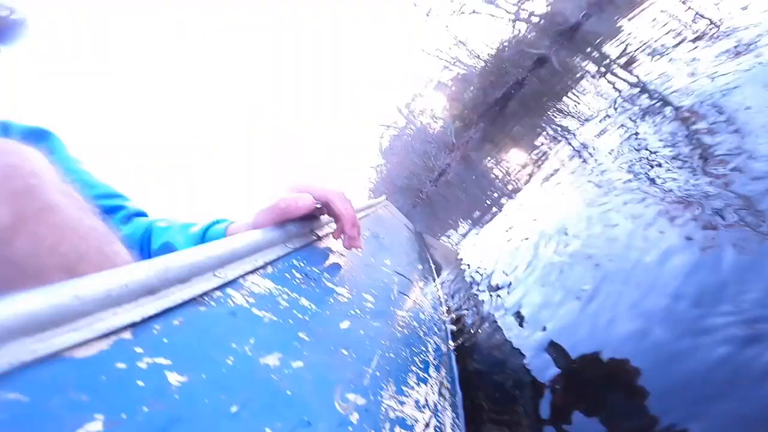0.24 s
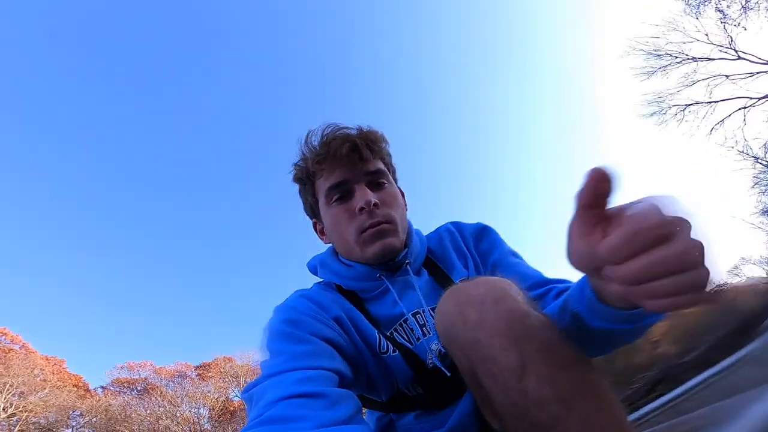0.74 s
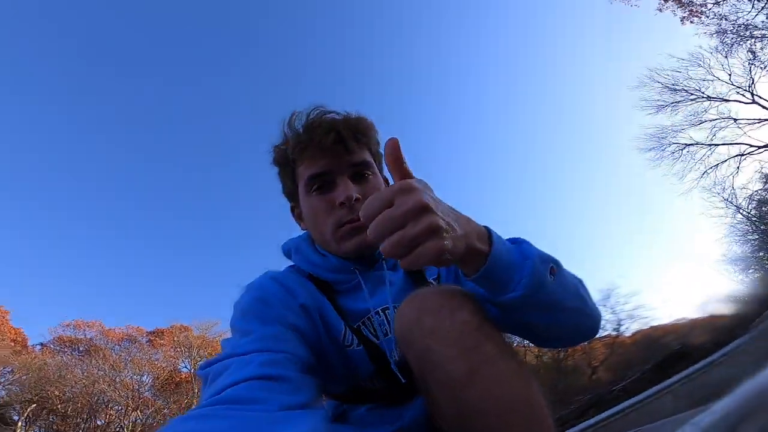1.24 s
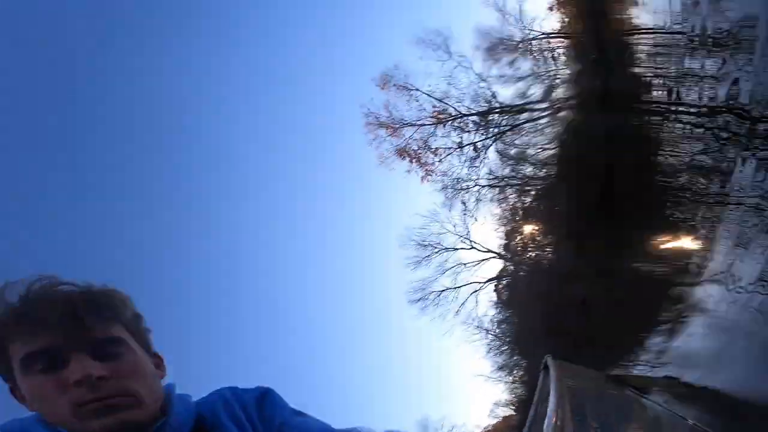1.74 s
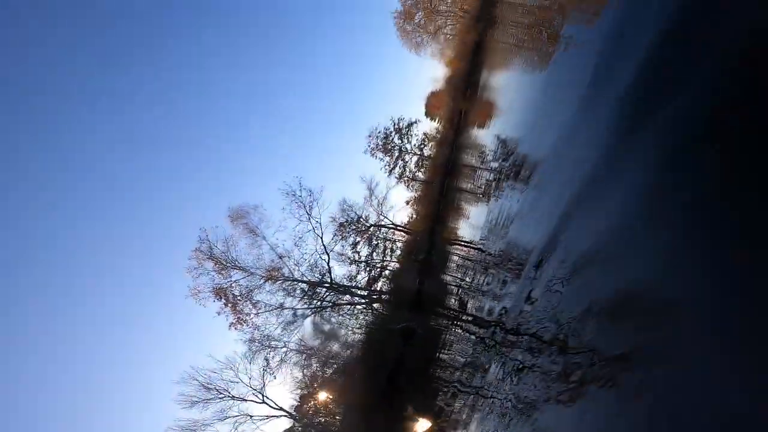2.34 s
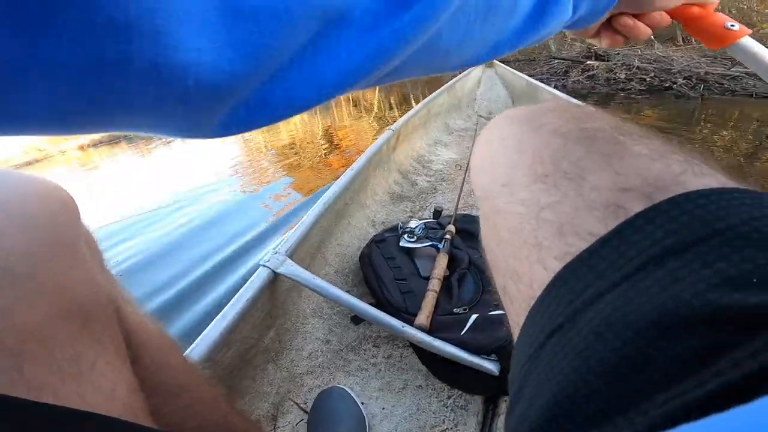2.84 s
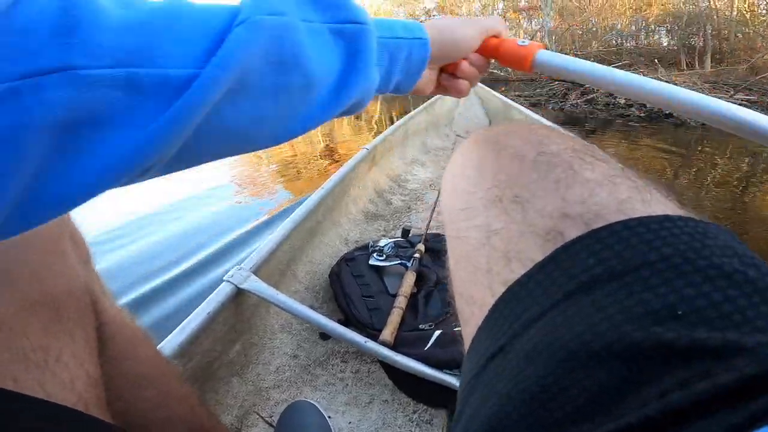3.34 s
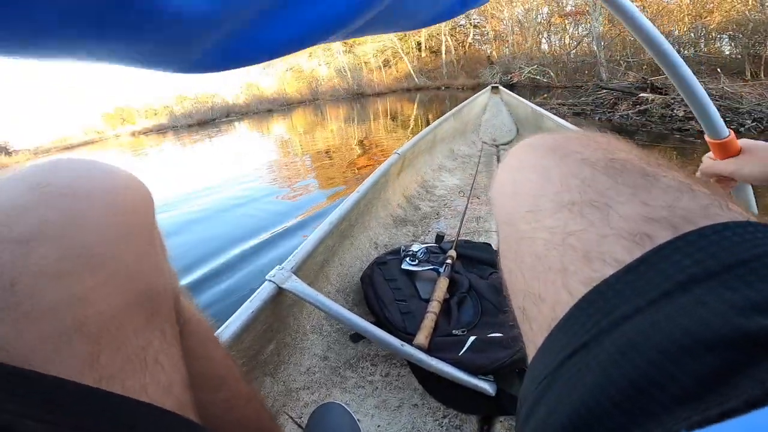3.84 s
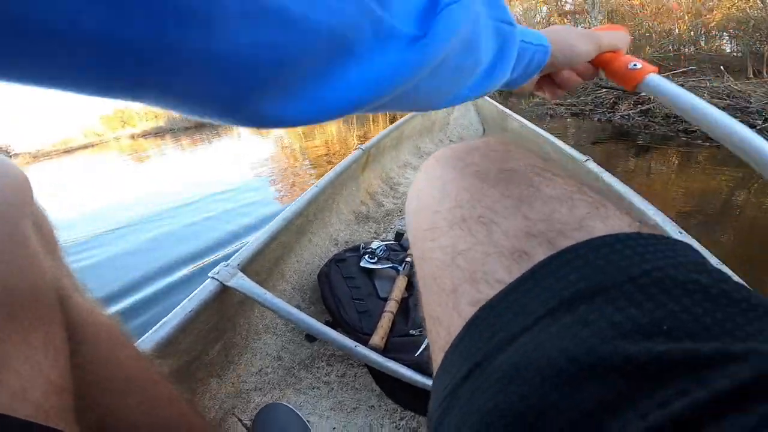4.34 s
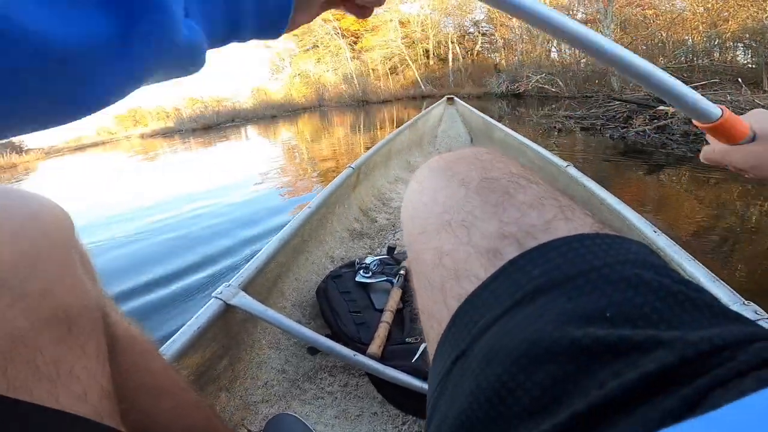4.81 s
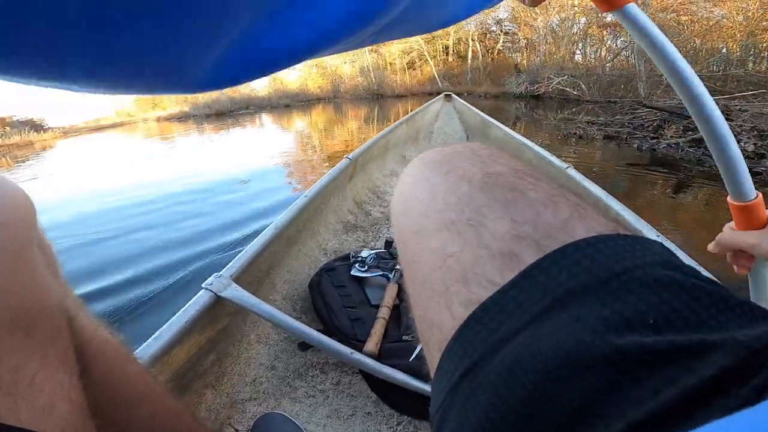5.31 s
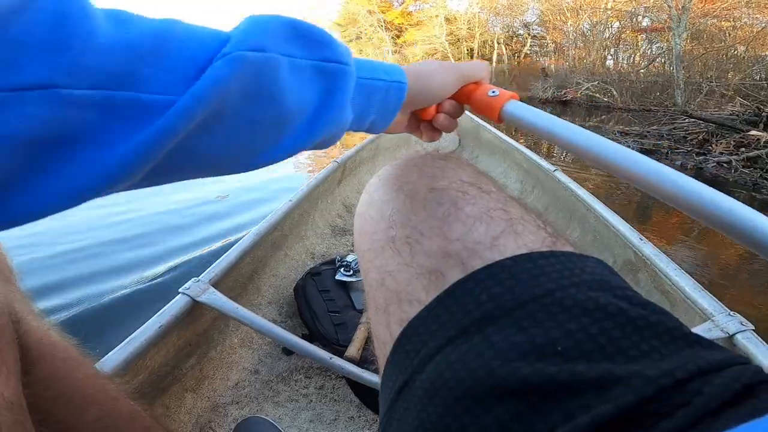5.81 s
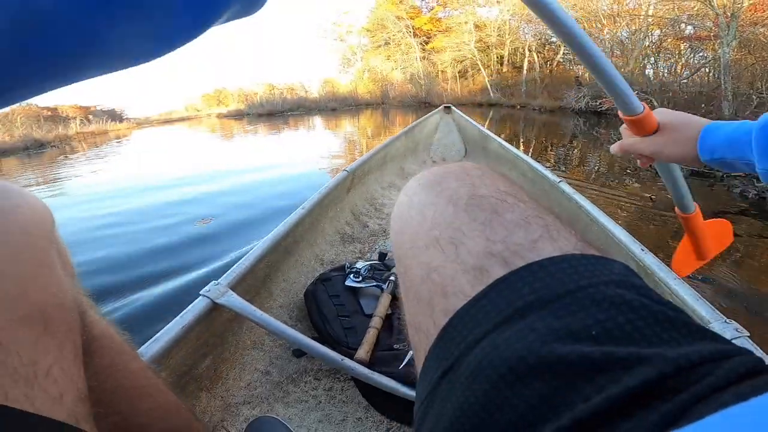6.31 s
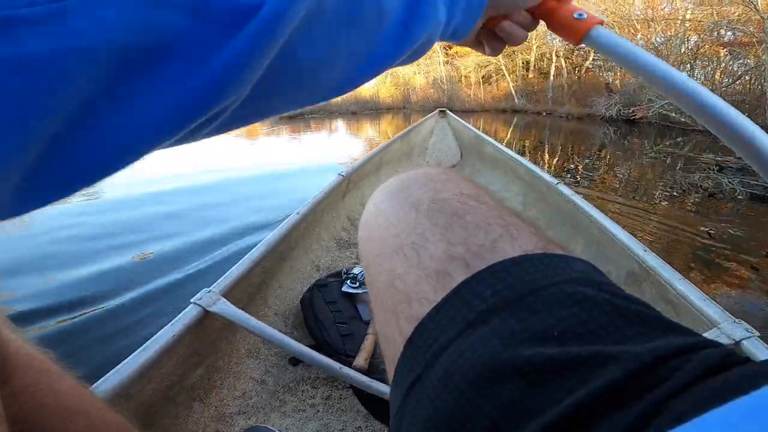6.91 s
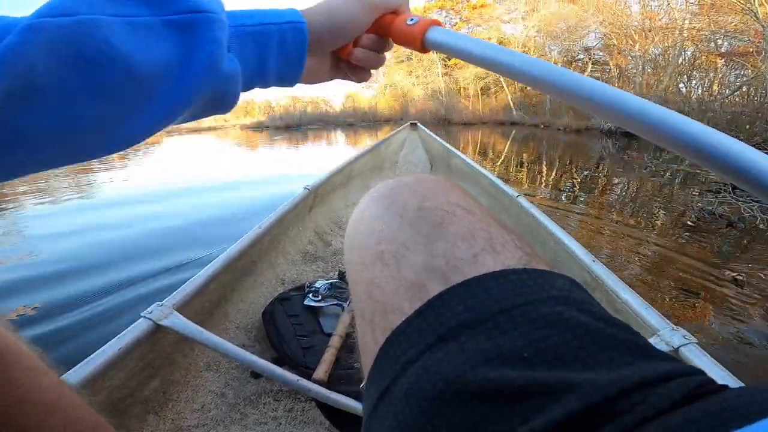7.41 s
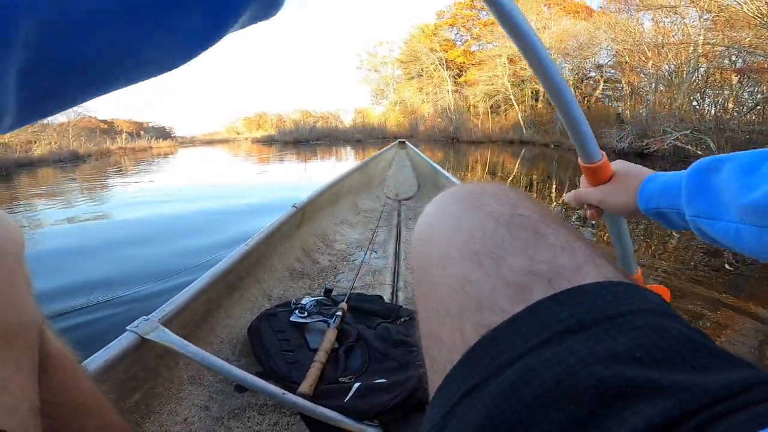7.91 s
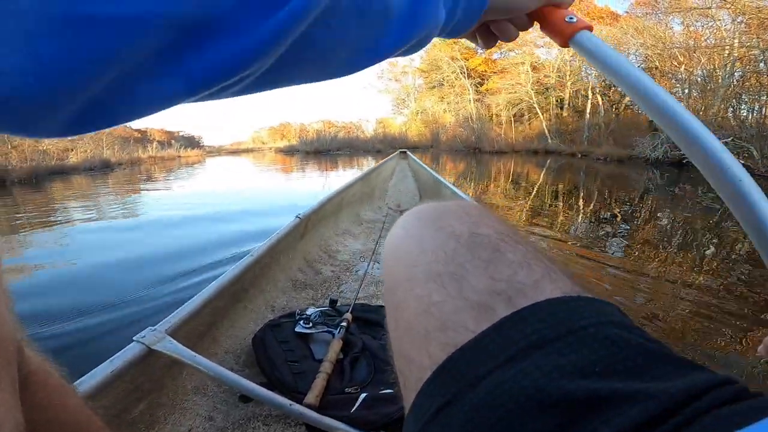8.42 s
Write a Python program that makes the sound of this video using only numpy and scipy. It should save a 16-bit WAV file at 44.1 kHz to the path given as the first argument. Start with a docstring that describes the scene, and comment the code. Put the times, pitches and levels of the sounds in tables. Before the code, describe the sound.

For the first 2.4 seconds a microphone in a wet, sealed case is swung by hand: muffled thumps, taps, low rumble and finger rubbing, easing around one second and returning at about 1.6. After a very brief silence the sound becomes clearer, close to someone paddling a canoe on a lake. The paddle shaft knocks against the hull in hollow, ringing clusters at about 2.5 and 2.8 seconds, with sharp ticks on the rim. The busiest cluster comes from 4 to 4.3 seconds, with a short scrape and rattle, and the last near 5.4. Meanwhile water laps along the hull, swelling with each stroke, as air pockets gurgle round the blade and drops splash and trickle. From 5.5 seconds the water's hiss is quieter. Gentle gurgling strokes come near 5.8, 7.1 and 8.4 seconds, with a few light ticks until the end at about 8.7.

```python
"""A small sealed camera is swung by hand over a lake: thumps and rubbing reach it through its wet case.
At 2.4 s comes a brief silence; after it the camera rides on a paddler's chest. Until about 5.5 s the
paddle shaft knocks the canoe in clusters, ringing its hull and ticking on its rim. Air pockets gurgle
round the blade, drops splash and trickle, and water laps along the hull, swelling with each stroke.
In the last three seconds the water's hiss is quieter, under gurgles, strokes and light ticks."""
import sys
import numpy as np
from scipy import signal
from scipy.fft import rfft, irfft, next_fast_len
from scipy.io import wavfile
from scipy.ndimage import uniform_filter1d

SR = 44100
rng = np.random.default_rng(int(sys.argv[2]) if len(sys.argv) > 2 else 0)


def wav_out(sig):
    """Save sig, one row per channel (or a flat mono array), as 16-bit PCM at SR to the path in sys.argv[1]."""
    wavfile.write(sys.argv[1], SR, np.round(np.clip(np.atleast_2d(sig).T, -1, 1) * 32767).astype(np.int16))


N = 381906
T = np.arange(N) / SR
HELD_END_S, WORN_START_S, WORN_FULL_S = 2.428, 2.449, 2.462

# shaft on hull, bounces included: (time [s], level [dB], favoured pitch [Hz], crack level [dB])
HULL_KNOCKS = [(2.461, -19, 200, -36), (2.482, -21.5, 207, -45), (2.507, -34, 258, -55),
               (2.814, -24.5, 350, -35), (2.816, -11, 141, -52), (2.825, -23, 340, -41),
               (2.868, -30.5, 480, -59), (2.912, -24, 413, -54), (2.975, -29.5, 464, -58),
               (3.345, -33.5, 49.6, -75), (3.991, -11.5, 228, -29), (4.012, -20.5, 226, -54),
               (4.023, -25, 307, -50), (4.045, -24, 206, -48), (4.071, -22.5, 258, -43),
               (4.124, -17.5, 250, -47), (4.155, -20.5, 230, -40), (4.192, -21.5, 300, -35.5),
               (4.199, -11, 190, -30.5), (4.224, -24.5, 140, -43), (4.257, -25.5, 123, -50),
               (4.319, -26, 417, -49), (5.341, -14, 213, -29), (5.36, -16.5, 207, -59),
               (5.374, -24, 270, -56), (5.396, -30.5, 288, -68), (5.434, -22, 131, -42),
               (5.456, -27, 300, -33.5), (5.459, -14.5, 236, -34.5), (5.474, -20, 240, -52),
               (5.49, -34, 250, -62), (5.515, -27, 143, -58), (5.526, -30, 400, -56),
               (5.545, -33.5, 220, -59)]
# (frequency [Hz], gain [dB], free t60 [s])
HULL_MODES = [(62, -10, 1), (118.7, 1.5, 0.26), (143.2, -1, 0.51), (171.7, -3.5, 0.47), (217, -2, 0.37),
              (249.3, 0, 0.29), (274.5, 6, 0.13), (345.3, 1, 0.36), (387.5, 4.5, 0.22), (431.4, 1, 0.17),
              (492, 6, 0.045), (505, 4.5, 0.15), (706, -18.5, 0.035), (900, -1, 0.19)]
# (frequency [Hz], gain over crack [dB], t60 [s])
RIM_MODES = [(760, -3, 0.023), (1017, 7, 0.015), (1350, -3.5, 0.06), (1983, 1, 0.05), (2650, -22.5, 0.018),
             (3640, -10, 0.025)]


def knocks():
    """Each blow rings hull and rim; high hull modes arrive first, as bending waves do. Panels rattle."""
    off_pitch_db_per_octave, rattle_hz = -9.5, 457
    out = np.zeros(N)
    scatter = rng.standard_normal((len(HULL_KNOCKS), len(HULL_MODES), 3))
    noise = rng.standard_normal((len(HULL_KNOCKS), 2, SR // 6))
    for (s, knock_db, favoured_hz, crack_db), draws, (crack, rattle) in zip(HULL_KNOCKS, scatter, noise):
        # the touching shaft damps the hull; higher, lighter taps die sooner
        t60_share = 0.56 * min(200 / favoured_hz, 1) ** 0.83
        for (hz, db, t60), (detune, uneven, skew) in zip(HULL_MODES, draws):
            drive_db = knock_db + off_pitch_db_per_octave * abs(np.log2(hz / favoured_hz))
            mode = ring(hz * (1 + 0.027 * detune), t60 * t60_share, rise=0.3 / hz, phase=np.pi + .7 * skew)
            add(out, s + 0.8 / hz, undb(drive_db + db + 2 * uneven) * mode)
        for (hz, db, t60), (detune, uneven, _) in zip(RIM_MODES, draws):
            mode = ring(hz * (1 + 0.036 * detune), t60, rise=0.0004)
            add(out, s, undb(crack_db + db + 3 * uneven) * mode)
        add(out, s, undb(crack_db) * burst(crack, 840, 1300, 0.19))
        add(out, s, undb(crack_db - 0.5) * burst(crack[:2000], 1600, 2800, 0.045))  # bright snap
        add(out, s, undb(crack_db - 13) * burst(crack[:1200], 11500, 4000, 0.035))  # sharp edge
        rattle_db = knock_db + off_pitch_db_per_octave * abs(np.log2(rattle_hz / favoured_hz)) - 4.5
        add(out, s, undb(rattle_db) * burst(rattle, rattle_hz, 550, 0.06, rise=0.004))
    return out


# (time [s], gain [dB], pitch [Hz])
SHAFT_RATTLES = [(4.205, 0, 4150), (4.333, -6, 3960), (4.395, -11, 4150), (5.475, -13, 4150)]
# (level [dB], pitch [ratio], width [Hz], t60 [s])
SHAFT_MODES = [(-47, 1, 70, .3), (-40, .48, 90, .06)]


def shaft_rattles():
    """The shaft's tube rattles free and rings in narrow bands."""
    out = np.zeros(N)
    for s, gain_db, hz in SHAFT_RATTLES:
        noise = rng.standard_normal(SR // 5)
        for db, ratio, width, t60 in SHAFT_MODES:
            add(out, s, undb(gain_db + db) * burst(noise, hz * ratio, width, t60))
    return out


# (time [s], port ring level [dB], body level [dB])
RIM_TICKS = [(2.779, -48, -40), (2.815, -27, -45), (2.917, -51, -60), (2.977, -43, -54), (3.4487, -44, -48),
             (3.4648, -38, -37), (3.9555, -34.5, -38), (3.972, -38, -36), (3.9922, -27.5, -46),
             (4.006, -28, -52), (4.016, -38, -52), (4.0496, -34, -52), (4.0876, -35, -49),
             (4.156, -35, -39), (4.196, -23.5, -30), (4.261, -40, -36.5), (4.2905, -42, -34.5),
             (4.317, -32, -45), (4.334, -39, -35), (4.396, -40, -42), (4.758, -38.5, -37),
             (5.203, -40, -38.5), (5.251, -44.5, -40), (5.3427, -29, -43), (5.431, -48, -58),
             (5.449, -39, -48), (5.457, -25, -43), (5.547, -42, -67), (5.564, -45, -70), (6.048, -42, -45),
             (7.655, -47, -63), (8.085, -68, -40.5), (8.179, -35, -68), (8.278, -59, -38.5),
             (8.291, -70, -44), (8.308, -49, -52), (8.521, -42, -70), (8.6144, -43, -66),
             (8.652, -44, -40.5)]


def rim_ticks():
    """Shaft, gear and drips tick on the rim; the microphone port rings after each contact."""
    port_hz = 6600
    out = np.zeros(N)
    for s, port_db, body_db in RIM_TICKS:
        noise = rng.standard_normal(SR // 40)
        add(out, s, undb(port_db - 2) * burst(noise, port_hz, 1000, 0.025))
        add(out, s, undb(port_db - 3) * ring(port_hz * (1 + 0.025 * noise[0]), 0.012, rise=0.0003))
        add(out, s, undb(body_db) * burst(noise, 2600, 1700, 0.028, rise=0.00048))
    return out


def shaft_slide():
    """The shaft slides along the rim in uneven rasps of tiny contacts; the hull panels answer."""
    contacts = grains(4000, spread_db=8) * undb(1.5 * walk(30))
    rasp = band(contacts, 5100, 7000) + undb(16) * (band(contacts, 1000, 1300) + band(contacts, 1700, 150))
    panels = undb(5) * unit(band(contacts, 360, 320))
    return undb(-46) * peak(4.1, rise=0.14, fall=0.18) * (unit(rasp) + panels)


# (time [s], thump level [dB], tap level [dB], tap pitch [Hz], click level [dB], click pitch [Hz])
CASE_BUMPS = [(0.0, -10, -32, 360, -78, 2020), (0.056, -37, -25.5, 550, -42.5, 1210),
              (0.132, -47, -29, 314, -73, 1190), (0.186, -19, -19.5, 320, -41.5, 1870),
              (0.221, -23, -17.5, 418, -65.5, 1500), (0.318, -42, -29, 420, -40, 1310),
              (0.346, -14, -18, 412, -54, 2200), (0.406, -36, -40, 496, -46.5, 3530),
              (0.493, -21, -18.5, 380, -50, 2200), (0.578, -17.5, -28, 930, -57, 2500),
              (0.651, -10.5, -18.5, 850, -43.5, 3660), (0.742, -25, -30.5, 444, -61, 1500),
              (1.59, -51, -33.5, 610, -70, 1500), (1.647, -24.5, -28, 533, -60, 2470),
              (1.703, -30.5, -21.5, 736, -54.5, 2500), (1.814, -22, -18, 550, -63, 2010),
              (1.847, -25, -16, 224, -64, 2000), (1.867, -28.5, -25, 281, -71, 2000),
              (1.885, -18.5, -34, 307, -66, 4020), (1.98, -40, -42, 506, -63, 2500),
              (2.115, -19.5, -26, 440, -55, 4100), (2.209, -18, -31, 438, -71, 2500),
              (2.31, -16.5, -34, 382, -70, 2000), (2.398, -18, -32, 407, -57, 1780)]


def case_bumps():
    """Each bump on the case gives a slow thump, a tap and a click."""
    thump_hz = 42.7
    out = np.zeros(N)
    for s, thump_db, tap_db, tap_hz, click_db, click_hz in CASE_BUMPS:
        noise = rng.standard_normal(SR // 15)
        add(out, s, undb(thump_db) * ring(thump_hz * np.exp(0.077 * noise[0]), 0.13, rise=0.004))
        add(out, s, undb(tap_db) * ring(tap_hz, 0.021, rise=0.0028))
        add(out, s, undb(tap_db - 28) * burst(noise[::-1], 713, 310, 0.065))
        add(out, s, undb(click_db) * burst(noise, click_hz, 0.73 * click_hz, 0.012))
        add(out, s, undb(click_db) * ring(click_hz, 0.008, rise=.0004))
    return out


# (peak time [s], rise [s], fall [s], scrape level [dB], hiss level [dB])
FINGER_DRAGS = [(0.073, 0.056, 0.17, -38.5, -82), (0.188, 0.019, 0.025, -24.5, -67),
                (0.42, 0.052, 0.031, -34, -53), (0.478, 0.18, 0.17, -36, -51.5),
                (0.584, 0.021, 0.019, -34.5, -71), (1.655, 0.024, 0.1, -36, -63),
                (1.711, 0.03, 0.17, -34, -66), (1.826, 0.092, 0.064, -33, -68),
                (1.9, 0.031, 0.21, -45.5, -71), (2.132, 0.12, 0.32, -61, -68)]


def finger_drags():
    """Gains of scrape and hiss: each drag swells and fades over a faint steady touch."""
    scrape, hiss, edge_db = undb(-85), undb(-77), -31.5
    for s, rise, fall, scrape_db, hiss_db in FINGER_DRAGS:
        ramp = peak(s, rise, fall)
        envelope = undb(edge_db * (1 - ramp)) * (ramp > 0)
        scrape = scrape + undb(scrape_db) * envelope
        hiss = hiss + undb(hiss_db) * envelope
    return scrape, hiss


# (time [s], rumble level [dB])
HAND_SHAKE = [(0.0, -16), (0.05, -33), (0.16, -31), (0.2, -20), (0.28, -27), (0.47, -23), (0.56, -29),
              (0.66, -26.5), (0.72, -48), (0.85, -47), (1.3, -57.5), (1.62, -38.5), (1.84, -33),
              (2.09, -37), (2.12, -21.5), (2.19, -29.5), (2.42, -27.5)]
# (frequency [Hz], width [Hz], gain [dB])
CASE_MODES = [(159, 50, 7.5), (281.4, 36, 4.5), (415.5, 89, 6), (554, 21, -1.5)]
# (frequency [Hz], width [Hz], gain [dB])
SCRAPE_MODES = [(825, 88, 33), (920, 69, 31.5), (1290, 110, -9)]


def case_rubbing():
    """The shaken case rumbles; skin sticks and slips on it and drives its resonances."""
    shake_gain = undb(curve(HAND_SHAKE))
    scrape_gain, hiss_gain = finger_drags()
    case_gain = undb(-12.5) * shake_gain + undb(3.5) * scrape_gain
    friction = unit(grains(2500, spread_db=8))
    rumble = band(band(rng.standard_normal(N), 13, 39), 24, 85)
    case, scrape = (sum(undb(db) * band(band(friction, hz, width), hz, 2 * width) for hz, width, db in modes)
                    for modes in (CASE_MODES, SCRAPE_MODES))
    stick_slip = unit(grains(900, spread_db=14) * undb(3 * walk(60)))
    hiss = band(band(band(friction + .8 * stick_slip, 1500, 2600), 1700, 3600), 2000, 3500)
    body = shake_gain * unit(rumble) + case_gain * unit(case) + scrape_gain * unit(scrape)
    return lowpass(body, 1500) + hiss_gain * unit(hiss)  # water in the port dulls the body


# (time [s], level [dB])
FAINT_CRACKLES = [(.352, -60), (.663, -62), (2.122, -55), (2.128, -55), (2.138, -57)]


def faint_crackles():
    """A few faint, dry, thin clicks."""
    out = np.zeros(N)
    for s, db in FAINT_CRACKLES:
        add(out, s, undb(db) * np.array([1., -1.]))
    return out


# (time [s], level [dB], pitch [Hz])
AIR_POCKETS = [(2.668, -30.5, 355), (2.736, -22.5, 374), (2.753, -28, 1500), (2.769, -26, 410),
               (2.77, -28, 1100), (2.785, -31.5, 424), (3.31, -30, 740), (3.089, -34, 144),
               (3.156, -28.5, 414), (3.35, -33.5, 488), (3.4, -26, 404), (3.444, -33.5, 205),
               (3.459, -29.5, 1240), (3.462, -28.5, 1830), (3.515, -28, 150), (4.26, -27.5, 2040),
               (4.424, -33, 129), (4.435, -33, 770), (4.516, -27.5, 645), (4.549, -29.5, 434),
               (4.639, -33, 385), (4.741, -32, 380), (5.03, -36, 426), (5.047, -36, 1120),
               (5.29, -30.5, 1160), (5.629, -39, 460), (5.63, -35, 910), (5.655, -31, 435),
               (5.897, -31, 432), (5.902, -27, 640), (5.971, -32, 1115), (6.06, -36.5, 199),
               (6.239, -34.5, 212), (6.798, -36, 416), (7.003, -30, 419), (7.017, -28.5, 433),
               (7.06, -31.5, 730), (7.099, -31.5, 637), (7.117, -44, 392), (7.169, -37.5, 138),
               (7.188, -34, 567), (7.215, -28.5, 1410), (7.299, -35.5, 164), (7.357, -38, 1080),
               (7.364, -35, 575), (7.375, -33, 1134), (7.392, -32, 1140), (7.279, -36.5, 245),
               (7.41, -35, 178), (7.454, -24.5, 177), (7.494, -27, 179.5), (7.529, -36, 585),
               (7.634, -29, 550), (7.65, -41, 766), (7.662, -44, 960), (7.6, -36, 575), (8.098, -35.5, 523),
               (8.34, -28.5, 378), (8.375, -27.5, 378), (8.36, -30.5, 302), (8.387, -35.5, 660),
               (8.404, -31, 413), (8.447, -40, 2160)]


def gurgles():
    """Air pockets and droplets round blade and hull sing, glide up a little, hold and close off."""
    cycles = 16.7
    out = np.zeros(N)
    for s, db, hz in AIR_POCKETS:
        t = T[:int(cycles / hz * SR)]
        age = t * hz / cycles
        envelope = (1 - np.exp(-t * hz / .9)) * np.exp(-np.log(1000) * age ** 2.5)
        add(out, s, undb(db) * envelope * np.sin(2 * np.pi * hz * t * (1 + 0.055 * age)))
    return out


# (peak time [s], rise [s], fall [s], level [dB], pitch [Hz])
BLADE_SPLASHES = [(4.75, 0.073, 0.048, -37.5, 965), (5.29, 0.034, 0.031, -41, 1120),
                  (7.08, .03, 0.1, -53, 796), (7.2, .15, 0.4, -61.5, 3740), (5.85, .15, .2, -61, 3850),
                  (7.65, 0.071, 0.035, -44.5, 900)]


def splashes():
    """The blade throws off short sprays of tiny droplets, each spray at its own pitch."""
    drops = grains(1800, spread_db=15)
    return sum(undb(db) * peak(s, rise, fall) * unit(band(band(drops, hz, 0.5 * hz), hz, 0.67 * hz))
               for s, rise, fall, db, hz in BLADE_SPLASHES)


def lapping_bubbles(lapping_db):
    """Faint bubbles ring at random in the lapping; small ones are higher, fainter and shorter."""
    out = np.zeros(N)
    for when, smallness, strength in rng.random((600, 3)):
        s = WORN_FULL_S + when * (N / SR - WORN_FULL_S)
        hz = 230 * 6 ** smallness
        db = -45.5 + lapping_db[int(s * SR) - 1] + 7 * strength - 8 * smallness
        add(out, s, undb(db) * ring(hz, 18 / hz + .012, rise=.003, glide=.15))
    return out


def trickle(wash_db):
    """Fine droplets run off blade and hull: tiny bubbles of uneven size, rising in pitch."""
    out = np.zeros(N)
    for when, smallness, faintness in rng.random((900, 3)):
        s = WORN_FULL_S + when * (N / SR - WORN_FULL_S)
        hz = 900 * 4.5 ** smallness
        db = -43.5 + wash_db[int(s * SR) - 1] - 3.36 * np.log(faintness + 0.0091) - 15 * smallness
        add(out, s, undb(db) * ring(hz, 24 / hz, rise=0.0012, glide=0.25))
    return out


# the water's hiss and splash grow quieter: (time [s], level [dB])
WATER_LEVEL = [(2.45, -1), (3.4, 0), (4.1, -1.5), (5.3, -3.5), (5.5, -7.5), (6.8, -11), (8.66, -10)]
# (hardest pull [s], low water swell [dB], spray swell [dB])
PADDLE_STROKES = [(2.751, 4, 1), (3.25, 8, 3), (4.1, 7, -2), (4.45, 6, 5), (5.779, 8.5, 9.5),
                  (7.1, 8.5, 12), (8.399, 6.5, 2.5)]
# slosh, lapping, wash, splash, fizz:
# (level share [ratio], stroke share [ratio], lag [s], rise [s], fall [s])
WATER_LAYERS = [(0.41, 0.7, 0.032, 0.7, 0.76), (0.26, 1, .01, 0.24, 0.53), (0.53, 0.52, 0.17, 0.22, 1),
                (0.98, 0.58, 0.032, 0.061, 0.44), (0.78, 0.6, 0.076, 0.19, 0.78)]


def stroke_swells():
    """Level change of each water layer in dB: a slow decline, plus swells that lag behind the blade."""
    swells_db = []
    for layer, (level_share, stroke_share, lag, rise, fall) in enumerate(WATER_LAYERS):
        strokes_db = sum((low_db if layer < 2 else spray_db) * peak(s + lag, rise, fall)
                         for s, low_db, spray_db in PADDLE_STROKES)
        swells_db.append(level_share * curve(WATER_LEVEL) + stroke_share * strokes_db)
    return swells_db


# (frequency [Hz], gain [dB])
LAKE_SPECTRUM = [(18, -47), (30, -6), (56, -6), (92, -9), (155, -1.5), (214, -1.5), (248, -6), (426, 1),
                 (814, -6), (926, -5), (1490, -5.5), (3240, -14), (3900, -18), (4380, -30.5), (5200, -24),
                 (6760, -46), (11400, -120)]


def lake(layers_db, fizz_db):
    """Third-octave bands of water hiss follow their layers and flicker; fizz sings in the port."""
    centres_hz = (100, 450, 1400, 3300)  # slosh, lapping, wash, splash
    port_hz = 6700
    water, shared_flicker = 0, walk(9)
    for hz in 30 * 2 ** np.arange(0, 8, 1 / 3):
        place = np.interp(np.log(hz), np.log(centres_hz), range(4))
        below = min(int(place), 2)
        swell_db = layers_db[below] + (place - below) * (layers_db[below + 1] - layers_db[below])
        hiss = band(band(rng.standard_normal(N), hz, hz / 3), hz, hz / 3)
        water = water + undb(swell_db + 1.2 * shared_flicker + 1.8 * walk(14)) * hiss
    spray = rng.standard_normal(N) + .5 * unit(grains(180, spread_db=23))
    fizz = band(band(spray, port_hz, 480), port_hz, 3600)
    flicker_db = walk(2.5) + .8 * shared_flicker + 1.7 * walk(25)
    fizz_gain = undb(-56.5 + fizz_db + flicker_db)
    return undb(-39.5) * unit(colour(water, LAKE_SPECTRUM)) + fizz_gain * unit(fizz)


# (frequency [Hz], gain [dB])
MUFFLED_SPECTRUM = [(18, -38), (30, -6.5), (89, -9.5), (145, -12), (181, -10), (351, -13.5), (547, -11),
                    (654, -16), (1140, -25.5), (1590, -35.5), (6000, -99.5), (7800, -111), (13200, -120)]


def muffled_lake():
    """The lake through the wet case: dull, wavering noise."""
    return undb(-45 + 1.2 * walk(9)) * unit(colour(rng.standard_normal(N), MUFFLED_SPECTRUM))


def undb(db):
    """dB to gain."""
    return 10 ** (np.asarray(db) / 20)


def unit(x):
    """Scale to rms 1."""
    return x / np.sqrt(np.mean(x ** 2))


def band(x, hz, width):
    """Resonance with gain 1 at the centre."""
    return signal.lfilter(*signal.iirpeak(hz, hz / width, fs=SR), x)


def lowpass(x, hz, order=3):
    """Roll off above hz."""
    return signal.sosfilt(signal.butter(order, hz, fs=SR, output="sos"), x)


def colour(x, table):
    """Filter x by (frequency [Hz], gain [dB]) points."""
    size = next_fast_len(N)
    points_hz, points_db = np.transpose(table)
    hz = np.maximum(np.arange(size // 2 + 1) * SR / size, 1)
    gain = undb(np.interp(np.log(hz), np.log(points_hz), points_db))
    return irfft(rfft(x, size) * gain, size)[:N]


def walk(rate_hz):
    """Random levels held 1 / rate_hz s and slewed twice; spread near 1."""
    hold = int(SR / rate_hz)
    steps = np.repeat(rng.standard_normal(N // hold + 1), hold)
    return 1.3 * uniform_filter1d(uniform_filter1d(steps, hold), hold)[:N]


def grains(per_s, spread_db):
    """Random impulses of uneven size."""
    chance, polarity, size = rng.random((3, N))
    return (chance < per_s / SR) * np.sign(polarity - .5) * undb(spread_db * size)


def curve(table):
    """Join (time [s], level [dB]) points by straight lines."""
    return np.interp(T, *np.transpose(table))


def peak(s, rise, fall):
    """Triangle of height 1 at s; rise and fall in seconds."""
    return np.interp(T, [s - rise, s, s + fall], [0, 1, 0])


def ring(hz, t60, rise=.001, glide=0., phase=0.):
    """Decaying mode that may glide upward; peak near 1."""
    t = T[:int(t60 * SR)]
    envelope = (1 - np.exp(-t / rise)) * np.exp(-np.log(1000) * t / t60)
    return envelope / envelope.max() * np.sin(2 * np.pi * hz * t * (1 + glide * t / t60) + phase)


def burst(noise, hz, width, t60, rise=0.0003):
    """Short fading band noise."""
    t = T[:len(noise)]
    envelope = (1 - np.exp(-t / rise)) ** 2 * np.exp(-np.log(1000) * t / t60)
    return envelope * unit(band(band(noise, hz, width), hz, width))


def add(out, s, x):
    """Mix x into out from s seconds on."""
    i = int(s * SR)
    out[i:i + len(x)] += x[:N - i]


def scene():
    """Hand-held part, brief silence, chest-worn part; mono."""
    held = lowpass(case_rubbing() + muffled_lake() + case_bumps(), 4800) + faint_crackles()
    slosh_db, lapping_db, wash_db, splash_db, fizz_db = stroke_swells()
    worn = knocks() + shaft_rattles() + rim_ticks() + shaft_slide()
    worn += gurgles() + lapping_bubbles(lapping_db)
    worn += lake((slosh_db, lapping_db, wash_db, splash_db), fizz_db) + splashes() + trickle(wash_db)
    fade_in = np.interp(T, (WORN_START_S, WORN_FULL_S), (0, 1))
    return (held * (T < HELD_END_S) + worn * fade_in)[None]


def record(dry):
    """The input stage rounds the loudest blows; the sealed case dulls the top; faint hiss."""
    ceiling, top_hz = .95, 14500
    rounded = ceiling * np.tanh(dry / ceiling)
    treble_leak = undb(-30) * signal.lfilter([1, -1], [1], rounded)
    dull = lowpass(rounded, 7900, order=6) + treble_leak
    hiss = undb(-104) * rng.standard_normal(dry.shape)
    return signal.sosfilt(signal.ellip(8, .2, 70, top_hz, fs=SR, output="sos"), dull) + hiss


dry = scene()
out = record(dry)
wav_out(out)
```